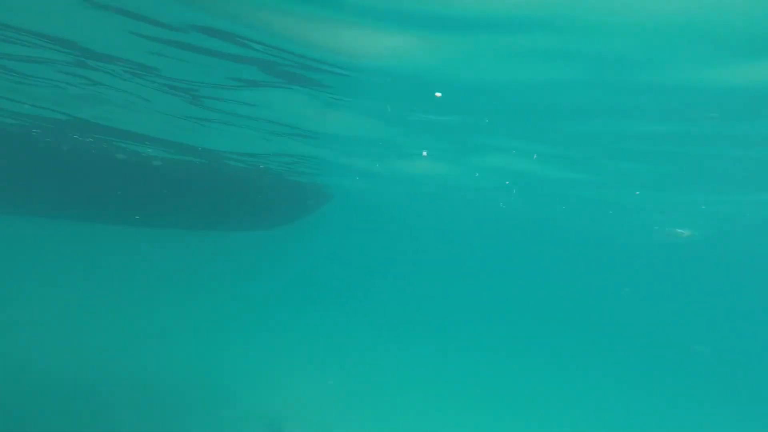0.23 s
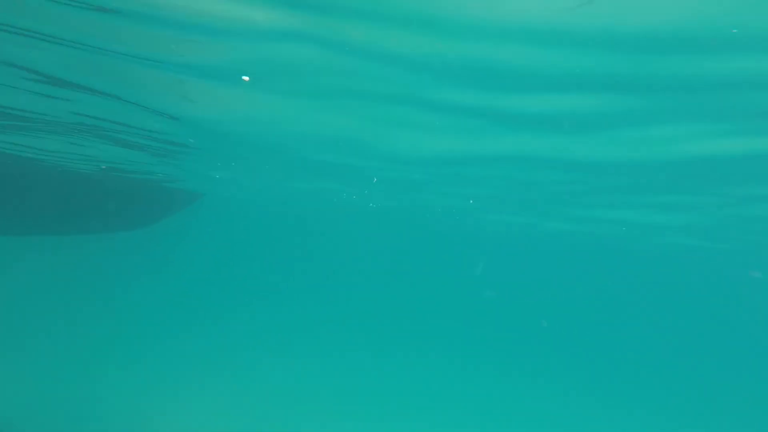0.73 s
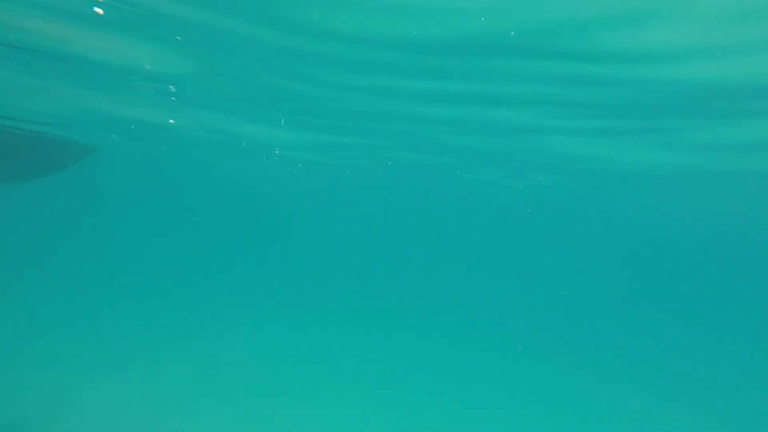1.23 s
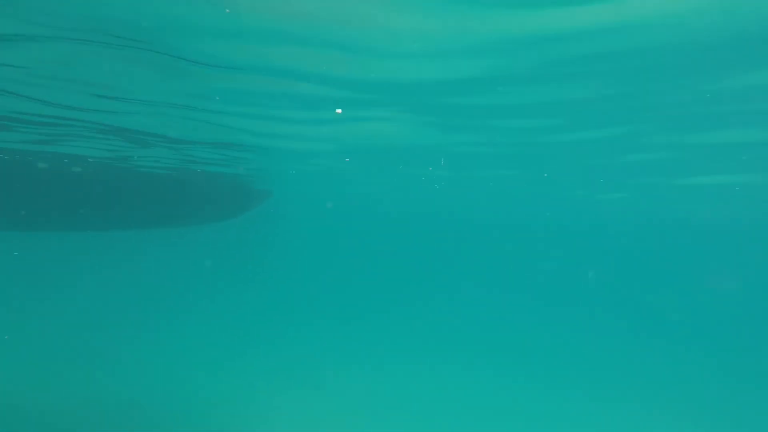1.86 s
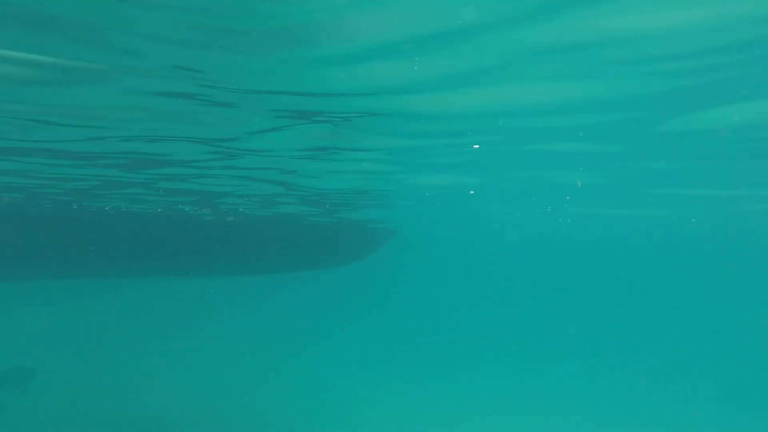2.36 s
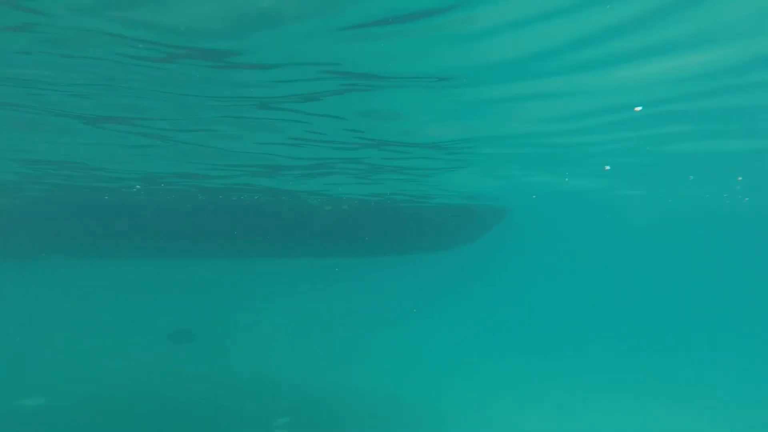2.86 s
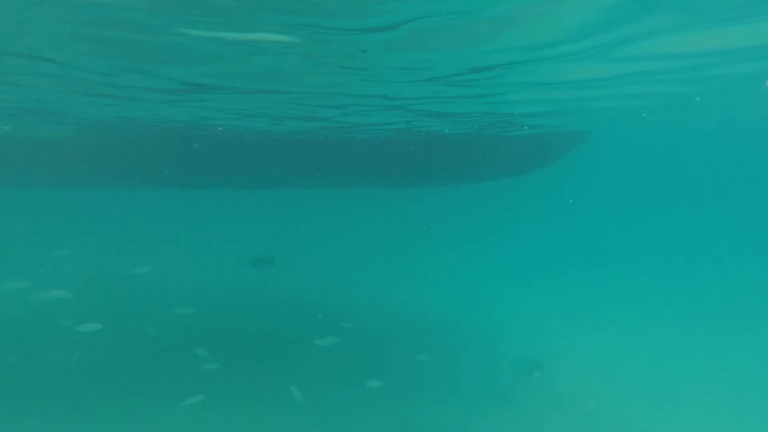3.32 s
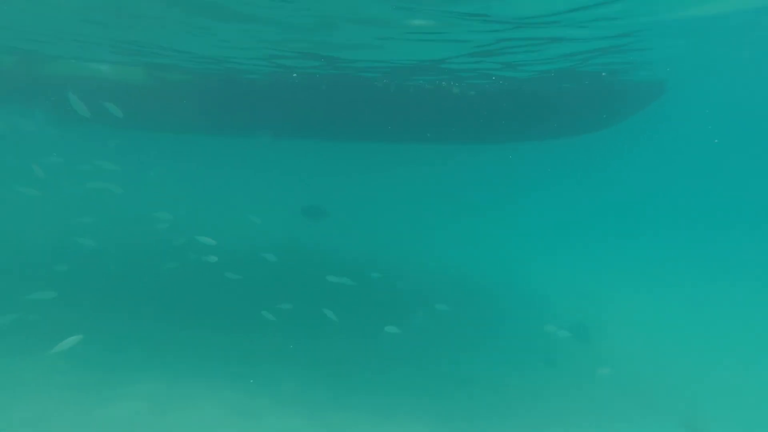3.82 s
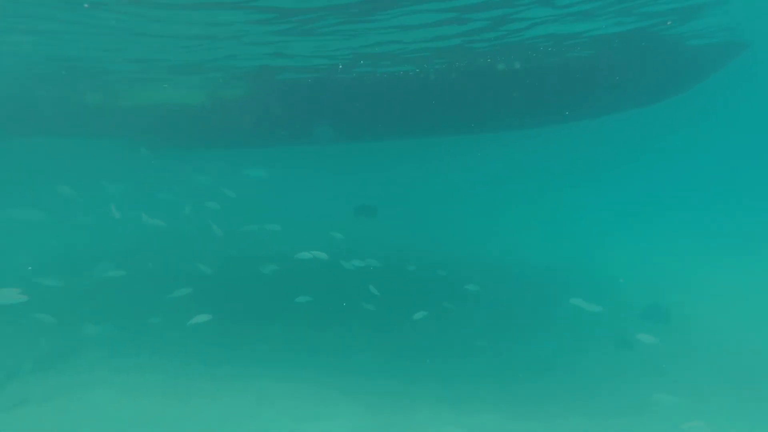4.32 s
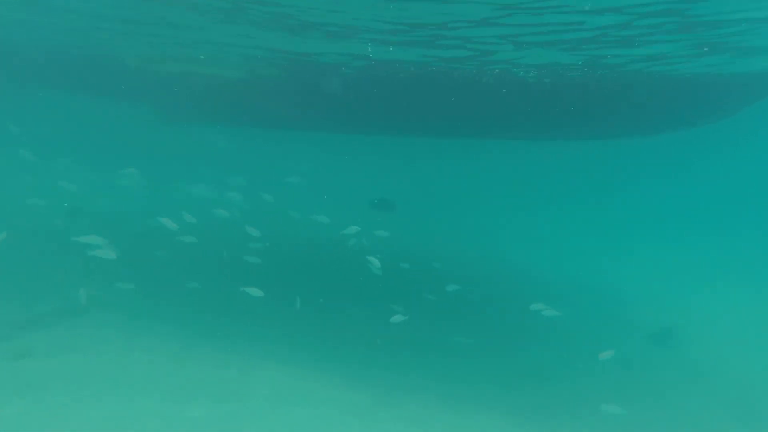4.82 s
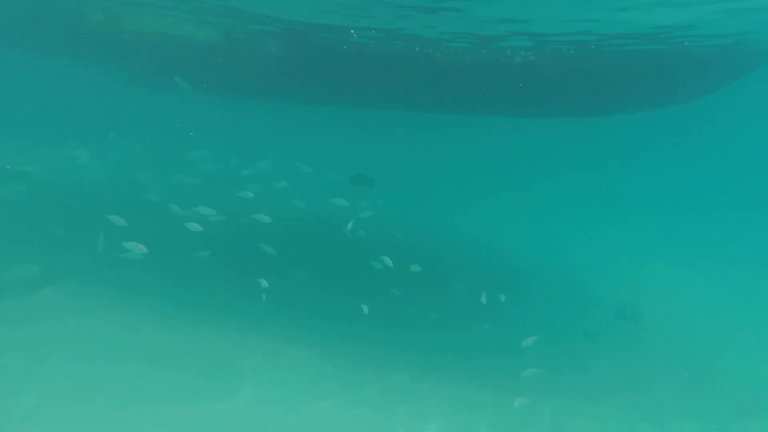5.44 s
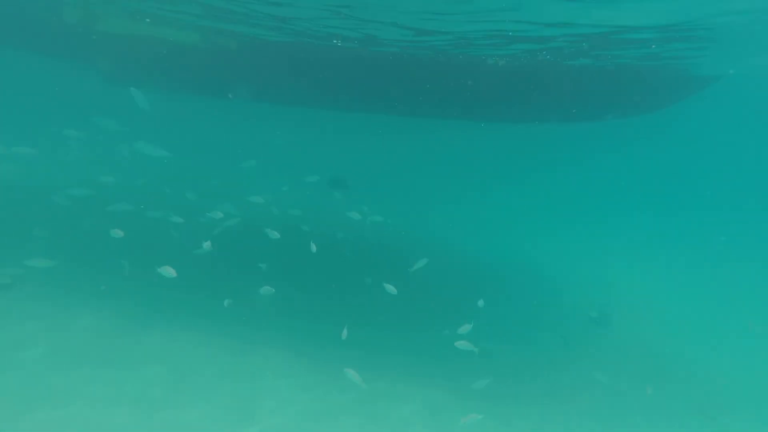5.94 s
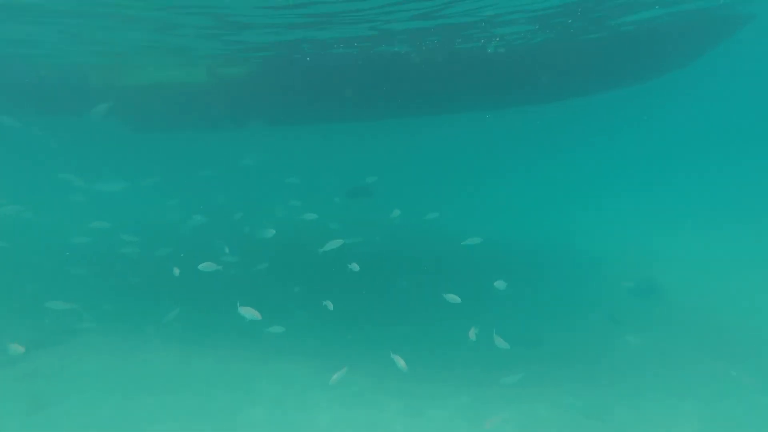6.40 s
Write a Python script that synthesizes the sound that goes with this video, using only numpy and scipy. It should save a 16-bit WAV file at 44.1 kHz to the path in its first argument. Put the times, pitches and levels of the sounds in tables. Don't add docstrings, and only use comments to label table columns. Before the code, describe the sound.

A submerged microphone in a hard housing picks up a deep, steady boat drone, muffled and wide. A close bubble cloud arrives suddenly, knocking, plopping and fizzing in clumps, with a brief slosh and a deep thud near three seconds and the loudest pops momentarily dipping the level. Then it breaks up into stray pops, and quiet motor hum, swell rumble and faint hiss remain.

```python
import sys
import numpy as np
from scipy import signal
from scipy.fft import rfft, irfft, next_fast_len
from scipy.io import wavfile
from scipy.ndimage import uniform_filter1d, minimum_filter1d, map_coordinates

SR = 44100
rng = np.random.default_rng(int(sys.argv[2]) if len(sys.argv) > 2 else 0)


def log_audio(samples):
    frames = np.atleast_2d(samples).T
    limited = np.clip(frames, -1, 1)
    pcm = np.round(limited * 32767).astype(np.int16)
    wavfile.write(sys.argv[1], SR, pcm)


def makeup_ratio(level_db):
    decades = np.asarray(level_db, float) / 20
    return 10 ** decades


N = 294147

# [t/s, gain/dB]
DRONE = [
    (0, 3),
    (4.6, -0.5),
    (4.85, -0.7),
    (6.67, -1.9),
]


def unit(x):
    return x / np.sqrt(np.mean(x ** 2) + 1e-20)


def along(points, hz):
    f, v = np.transpose(points)
    return np.interp(np.log(hz + 1), np.log(f + 1), v)


def curves(rows):
    s, *cols = np.transpose(rows)
    return [np.interp(np.arange(N) / SR, s, c) for c in cols]


def wobble(rate):
    knots = rng.standard_normal(int(N * rate / SR) + 4)
    return map_coordinates(knots, [np.arange(N) * rate / SR])


def filtered(x, response):
    m, edge = next_fast_len(N + SR // 2), SR // 20
    x = np.pad(x, [(0, 0)] * (np.ndim(x) - 1) + [(edge, edge)], mode="reflect")
    spectrum = rfft(x, m) * response(np.fft.rfftfreq(m, 1 / SR))
    return irfft(spectrum, m)[..., edge:edge + N]


def rush(spectrum, alike):
    turn = np.arccos(np.clip(alike, -1, 1)) / 2
    mid, side = filtered(rng.standard_normal((2, N)), lambda hz: makeup_ratio(along(spectrum, hz)))
    mid, side = np.cos(turn) * mid, np.sin(turn) * side
    return unit(np.array([mid + side, mid - side]))


def shell(f):
    # [f/Hz, width/Hz, level/dB]
    shell_modes = [(300, 790, -20.5), (833, 117, -1), (1223, 76, -11.5), (1470, 108, -10), (1950, 83, -11),
                   (2250, 190, -10.5), (3107, 280, -25.5), (3830, 350, -52.5), (4330, 100, -40),
                   (5900, 2400, -38.5), (6940, 680, -61), (9000, 2500, -59)]
    # [f/Hz, level difference/dB, right lead/rad]
    right_to_left = [(200, -2, .4), (300, 0, 1.8), (430, 12, 1.9), (530, 9, 3.8), (650, 1, 3.7),
                     (830, -8, 2.7), (1150, -10, 2.3), (1420, 2, 3.1), (2000, 2.5, 2), (2900, -3, 1.8),
                     (3700, 1, -.9), (5500, 14, -1.8), (7200, 8, -2.8), (9000, 0, -1.3)]
    left = 0
    for k, (hz, w, db) in enumerate(shell_modes):
        mode = 1j * f * w / (hz * hz - f * f + 1j * f * w)
        left = left + (-1) ** k * makeup_ratio(db) * mode
    hz, db, lead = np.transpose(right_to_left)
    across = makeup_ratio(along(np.c_[hz, db], f)) * np.exp(1j * along(np.c_[hz, lead], f))
    return np.array([left, left * across])


def bubbles(rows, rise, chirp, size=1800):
    s, db, hz, t60 = np.transpose(rows)[:, :, None]
    t = np.arange(size) / SR
    ring = np.sin(2 * np.pi * hz * t * (1 + chirp * t / t60))
    fade = makeup_ratio(db - 60 * t / np.maximum(t60, .001))
    onset = 1 - np.exp(-t * hz / rise)
    ring = ring * fade * onset
    at = np.round(s * SR).astype(int) + np.arange(size)
    return np.bincount(at.ravel(), ring.ravel(), N + size)[:N]


def water():
    # [f/Hz, level per Hz/dB]
    boat_noise = [(20, -13.5), (45, -8), (85, 0), (115, -11.5), (180, -16.5), (300, -19.5), (380, -28.5),
                  (520, -33.5), (680, -27.5), (1000, -41), (1300, -43), (2000, -54.5), (3200, -72),
                  (6000, -120)]
    # [t/s, level/dB]
    swells = [
        (0, -27.5),
        (.65, -29.5),
        (1.5, -22),
        (4.81, -23),
        (5.59, -21),
        (6.6, -25),
    ]
    calm_db, rise_db_s, fall_db_s = -35, 75, 53
    s, db = np.transpose(swells)[:, :, None]
    after = np.arange(N) / SR - s
    swell_db = (db + np.minimum(rise_db_s * after, -fall_db_s * after)).max(0)
    rumble_db = np.maximum(calm_db, swell_db)
    noise = makeup_ratio(curves(DRONE)[0] - 26.5 + 0.5 * wobble(6.4)) * rush(boat_noise, alike=0.35)
    lumps = rush([(3, -36.0), (10, -1.0), (25, 11.5), (45, -10.0), (80, -37.5), (200, -120)], alike=0.31)
    return noise + makeup_ratio(rumble_db + 6.0) * lumps


def engines():
    # [t/s, pitch/Hz, left level/dB, right level/dB]
    hum_low = [(0, 103.06, -27, -29.5), (2.15, 103.07, -23.3, -28), (2.45, 103.1, -29, -32),
               (2.85, 103.27, -23.5, -27), (3.34, 103.49, -24.4, -25.7), (3.95, 103.71, -34, -30),
               (4.67, 103.69, -33, -30.7), (5.34, 103.53, -28.4, -31.8), (6.1, 103.38, -31, -39.5),
               (6.67, 103.36, -29.5, -39)]
    hum_mid = [(0, 105.69, -26.5, -21.4), (1.5, 105.66, -33, -24.5), (2.67, 105.61, -41, -26),
               (3.4, 105.6, -32.5, -26.7), (4.2, 105.55, -32.5, -28.5), (5.34, 105.48, -44, -31.8),
               (6.67, 105.46, -43, -28.8)]
    hum_top = [(0, 107.21, -34, -31.5), (1.5, 107.21, -35, -42), (2.5, 107.23, -38, -40),
               (4, 107.32, -34.7, -39.5), (4.67, 107.36, -33.5, -32.2), (6.67, 107.4, -35.5, -32.3)]
    # [t/s, f/Hz, left level/dB, right level/dB]
    thrum = [
        (1, 75, -44, -50),
        (2, 75.6, -24, -30),
        (2.6, 75.6, -34, -39),
        (3.7, 74.2, -22.5, -28),
        (4.25, 75.5, -33, -38),
        (4.8, 75.5, -60, -60),
    ]
    # [f/Hz, left level/dB, right level/dB, left lead/rad]
    thin_tones = [(49.7, -39, -39, -0.7), (52.6, -34, -32, -1.3), (61.8, -40, -39, -0.2),
                  (78.1, -40, -34, -0.1), (82.6, -45, -33, -1.6), (97.1, -40, -38, -1.6),
                  (131.2, -43, -40, -0.3), (144.7, -50, -44, -1.7), (157.95, -37, -36, 0.8),
                  (159.5, -48, -42, -1.1), (206.1, -54, -45, -2.1), (211.6, -40, -45, -0.0),
                  (214.1, -44, -48, -0.6), (215.1, -49, -46, -0.8), (254.5, -51, -49, -1.0),
                  (317.3, -55, -48, 1.8), (324.8, -45, -52, -2.1), (400.5, -62, -59, -0.5),
                  (428.5, -57, -61, -0.8), (467.8, -56, -64, 2.3), (476.2, -58, -57, -0.8),
                  (599.2, -55, -56, -1.6), (647.9, -57, -58, -0.5), (675.9, -61, -58, 0.5)]
    hum_in_step, overtones_in_step = .18, 1.41
    hum, tones, t = np.zeros((2, N)), np.zeros((2, N)), np.arange(N) / SR
    for rows in (hum_low, hum_mid, hum_top, thrum):
        hz, left_db, right_db = curves(rows)
        turns = np.cumsum(hz) / SR
        turns = turns - turns[round(hum_in_step * SR)]
        hum += np.sqrt(2) * makeup_ratio([left_db, right_db]) * np.cos(2 * np.pi * turns)
    for hz, left_db, right_db, lead in thin_tones:
        start = -hz * overtones_in_step if 210 < hz < 216 else rng.random()
        angle = 2 * np.pi * (hz * t + start) + .25 * wobble(.8)
        sway_db = 1.4 * np.array([wobble(.9), wobble(.9)])
        tones += makeup_ratio(sway_db + [[left_db], [right_db]]) * np.cos([angle + lead, angle])
    hum_gain = makeup_ratio(curves([(6.1, 0), (6.5, -7)])[0])
    return hum_gain * hum + makeup_ratio(curves(DRONE)[0] + 3.5) * tones


def knocks():
    # [t/s, peak level/dB, f/Hz, time to fall 60 dB/s]
    bumps = [
        (1.413, -4, 154, 0.016),
        (2.992, -12.5, 197, 0.021),
        (3.1, -2.5, 100, 0.036),
        (3.168, -16.5, 119.6, 0.093),
        (3.634, -14.5, 147.3, 0.058),
        (4.336, -25.5, 268.4, 0.12),
        (4.663, -22, 300, 0.02),
        (6.568, -8.5, 264, 0.021),
    ]
    return makeup_ratio(9.0) * bubbles(bumps, rise=0.96, chirp=0.025)


def swarm(level_db, hz, spread, cycles, scatter_db, count):
    when, pitch, size = rng.random((count, 3)).T
    pitch = hz * np.exp(spread * (2 * pitch - 1))
    peak_db = -scatter_db * np.log(size + 1 / 50)
    rows = np.c_[when * N / SR, peak_db, pitch, cycles / pitch]
    ringing = bubbles(rows, rise=0.54, chirp=0.28, size=round(min(800, 30 * SR / hz)))
    sound = filtered(ringing, shell)
    return makeup_ratio(level_db) * sound / np.std(sound.mean(0))


def cloud():
    # [t/s, density/dB, share of big bubbles/dB, share of small bubbles/dB]
    cloud_mix = [
        (1.15, -63.5, 1, -18.5),
        (1.42, -37, -6.5, -24),
        (2, -32.5, -5.5, -27.5),
        (2.9, -34.5, -9, -18.5),
        (3.15, -25.5, -3.5, -18),
        (3.6, -27.5, -7, -16.5),
        (4, -27, -24, -23.5),
        (4.4, -41.5, -20.5, -19),
        (5, -60, 4, -17),
    ]
    # [t/s, level/dB]
    bunches = [(1.73, 6), (2.48, 0.5), (2.62, 0.5), (3.08, -2.5), (3.219, 3.5), (3.729, 5), (4.34, 6)]
    # [t/s, level/dB]
    surge = [
        (3.09, -99),
        (3.1, -16),
        (3.13, -25),
        (3.24, -26),
        (3.27, -30.5),
        (3.9, -44.5),
        (4.0, -90),
    ]
    bunch_s = 0.045
    t = np.arange(N) / SR
    dense_db, big_db, small_db = curves(cloud_mix)
    present = (t > cloud_mix[0][0]) & (t < cloud_mix[-1][0])
    bunch_db = sum(db * np.exp(-((t - s) / bunch_s) ** 2) for s, db in bunches)
    clumps_db = 1.8 * wobble(35)
    tiny_db = -56.5 + .6 * (dense_db + 30.5) + 0.37 * big_db + clumps_db
    middle_db = dense_db + bunch_db + clumps_db - 2.0
    fizz = swarm(middle_db, hz=929, spread=0.34, cycles=19.0, scatter_db=2.0, count=2600)
    fizz += swarm(dense_db + big_db + .5, hz=445, spread=0.53, cycles=5.3, scatter_db=1.5, count=2000)
    fizz += swarm(dense_db + clumps_db + small_db - .5, hz=1900, spread=0.26, cycles=7.8,
                  scatter_db=3.0, count=5000)
    fizz += swarm(tiny_db, hz=5120, spread=0.49, cycles=7.7, scatter_db=0.0, count=9000)
    slosh = rush([(60, -35.5), (120, -2.0), (300, -8.0), (600, -7.5), (900, -16), (2000, -120)], alike=0.54)
    return present * fizz + makeup_ratio(curves(surge)[0] + 4.0 * wobble(40)) * slosh


def snaps():
    # [t/s, peak level/dB, sizzle level/dB, body level/dB]
    ticks = [(1.345, -47, -21, 8), (1.5094, -54.5, -11, 17), (1.767, -40, -33, -3), (1.8849, -29.5, -2, 17),
             (2.1014, -20.5, -45, -13.5), (2.1432, -40.5, -25.5, -25), (2.162, -38.5, -28, -4),
             (2.206, -36.5, -11, -10), (2.227, -46, -10, 3), (2.382, -45, -13, -13),
             (2.4048, -40.5, -14, -15), (2.4908, -35, -23, -7), (2.655, -38.5, -22, -13),
             (2.889, -42, -29, -13.5), (3.0839, -35, -34, -7), (3.195, -40, -24.5, -8),
             (3.2374, -33.5, -16, 16), (3.3163, -36, -12, -6), (3.4107, -46, -19, 11),
             (3.4214, -34.5, -27, -0.5), (3.4672, -36.5, -26, 2), (3.5054, -55, -6.5, 9),
             (3.5216, -38.5, -7, -7), (4.1534, -35, -22, -9), (4.252, -43.5, -23.5, -12),
             (4.3066, -46, -21, 12), (4.5122, -48.5, -7, -7), (4.987, -46, 3, -5.5)]
    t, sound = np.arange(700) / SR, np.zeros((2, N))
    s, db, sizzle_db, body_db = np.transpose(ticks)[:, :, None]
    at = (np.round(s * SR).astype(int) + np.arange(len(t))).ravel()
    parts = [(db + 9, 5500, .011),
             (db + sizzle_db + 11.5, 10000, .005),
             (db + np.minimum(body_db, 6) + 20.5, 2200, .008)]
    for level_db, hz, t60 in parts:
        envelope = makeup_ratio(level_db - 60 * t / t60) * (1 - np.exp(-t / 0.00019))
        burst = envelope * rng.standard_normal((len(s), len(t)))

        def band(f):
            response = shell(f)
            even = response / np.abs(response.mean(0) + 1e-5)
            return even / (1 + (np.log(f / hz + 1e-9) / 0.32) ** 4)

        sound += filtered(np.bincount(at, burst.ravel(), N + len(t))[:N], band)
    return sound


def pops(rows, gain_db, rise, chirp, t60=None):
    rows = np.array(rows if t60 is None else [(*row, t60) for row in rows], float)
    near = rows[:, 2] * np.array([[.9], [1], [1.1]])
    heard = np.abs(shell(near.ravel()).mean(0)).reshape(near.shape).mean(0)
    rows[:, 1] += gain_db - 20 * np.log10(heard)
    return filtered(bubbles(rows, rise, chirp), shell)


def small_bubbles():
    # [t/s, peak level/dB, f/Hz]
    pings = [(1.4438, -30, 2028), (1.5373, -29.5, 2717), (1.544, -21, 1756), (1.6217, -31, 2100),
             (1.7327, -33.5, 2162), (1.884, -26, 1392), (1.8842, -20, 2428), (1.952, -21.5, 2210),
             (2.028, -33, 1396), (2.191, -25.5, 1322), (2.539, -37, 1548), (2.7053, -36, 2096),
             (2.7824, -25.5, 2205), (2.835, -31.5, 2250), (3.0121, -26.5, 1375), (3.1643, -35, 2116),
             (3.355, -26, 2190), (3.2381, -19, 2083), (3.239, -13.5, 1330), (3.3249, -30, 2342),
             (3.369, -23.5, 1500), (3.5334, -37.5, 2186), (3.6149, -25.5, 2130), (3.6731, -21.5, 2003),
             (3.7489, -24.5, 1950), (3.9046, -35.5, 1876), (4.2787, -38, 2243), (4.5112, -44.5, 2365),
             (1.456, -40, 2324), (1.638, -40.5, 2203), (1.7613, -38, 2216), (2.57, -41, 2093),
             (2.6827, -42, 2040), (2.9531, -38.5, 2160), (3.1022, -33, 2200), (3.2145, -30.5, 1886),
             (3.34, -31.5, 2250), (3.369, -31.5, 1917), (3.6415, -36.5, 2216), (3.853, -40, 2060),
             (3.8855, -46, 2970), (1.884, -34.5, 3930), (1.8845, -35, 4560), (1.5335, -30, 1516),
             (4.357, -52, 2933), (4.63, -52, 2080), (4.849, -50, 2580), (4.96, -49, 2500)]
    # [t/s, peak level/dB, f/Hz]
    sparks = [(1.3465, -42, 4160), (1.4566, -47, 5670), (1.6832, -46.5, 4530), (1.7457, -43, 4084),
              (1.8824, -29, 3536), (1.9928, -47.5, 6560), (2.3003, -48.5, 4920), (2.3412, -49, 4000),
              (2.4456, -47.5, 5880), (2.7324, -45.5, 6240), (2.8082, -45.5, 5480), (2.9702, -46, 5450),
              (2.998, -44, 3490), (3.2171, -38, 4100), (3.362, -44.5, 5660), (3.5416, -43, 5960),
              (3.7099, -45, 3980), (3.8915, -41.5, 6350), (3.921, -47.5, 5360), (4.1807, -48.5, 5910),
              (4.277, -50, 4140), (4.4446, -49.5, 3450), (4.6276, -51.5, 5660)]
    return (pops(pings, gain_db=4.5, rise=0.3, chirp=0.028, t60=0.018)
            + pops(sparks, gain_db=1.5, rise=0.44, chirp=0.02, t60=0.0098))


def big_bubbles():
    # [t/s, peak level/dB, f/Hz]
    glugs = [(1.759, -25, 441), (1.941, -21.5, 400), (2.181, -20.5, 430.4), (2.959, -16.5, 425.5),
             (2.988, -22.5, 320), (3.019, -13, 378), (3.099, -12.5, 409), (3.19, -23, 445),
             (3.213, -19.5, 391), (1.705, -27.5, 426), (1.799, -25.5, 414), (1.858, -25, 570),
             (2.093, -24.5, 407), (2.482, -27, 443.5), (2.804, -28.5, 442), (2.839, -28, 418),
             (3.138, -22.5, 386.5), (3.276, -21.5, 383), (3.385, -25.5, 451), (3.498, -25.5, 416),
             (3.649, -29, 461), (3.988, -25.5, 434.6)]
    return pops(glugs, gain_db=7.0, rise=0.87, chirp=0.039, t60=0.032)


def shell_bubbles():
    # [t/s, peak level/dB, f/Hz]
    rims = [(1.7016, -19, 1056), (2.278, -36.5, 1172), (2.294, -25, 1108), (2.4773, -19.5, 1114),
            (2.542, -19.5, 1122), (2.6192, -35.5, 1123), (2.7039, -28.5, 1145), (2.8471, -27.5, 1178),
            (2.9489, -30, 1168), (3.1026, -25.5, 1105), (3.4859, -27.5, 1082), (3.5985, -28.5, 1121),
            (3.6293, -26, 1187), (3.7157, -24.5, 1082), (3.9527, -30, 1070), (3.9784, -30, 1058),
            (4.0023, -27, 1124)]
    # [t/s, peak level/dB, f/Hz, time to fall 60 dB/s]
    trapped = [
        (1.824, -4, 786, 0.031),
        (3.047, -10, 905, 0.087),
    ]
    return (pops(rims, gain_db=3.0, rise=0.73, chirp=0.033, t60=0.042)
            + pops(trapped, gain_db=9.5, rise=5.6, chirp=0.02))


def middle_bubbles():
    # [t/s, peak level/dB, f/Hz]
    plops = [(1.456, -20, 857), (1.537, -19, 908), (1.562, -18, 1106), (1.683, -22, 842),
             (1.698, -19.5, 816), (1.777, -14, 710), (1.797, -24, 810), (1.923, -22, 780),
             (2.151, -21, 885), (2.305, -14.5, 852), (2.364, -13.5, 894), (2.531, -13, 893),
             (2.705, -15, 897), (2.841, -16.5, 890), (2.937, -27, 870), (3.106, -20, 804),
             (3.124, -14.5, 863), (3.157, -16.5, 827), (3.368, -16.5, 824), (3.47, -22, 913),
             (3.719, -14.5, 943), (3.862, -16, 740), (3.894, -19, 856), (3.932, -31.5, 846),
             (4.004, -20.5, 854), (4.051, -16, 857), (4.215, -19, 916), (4.444, -31, 847),
             (4.51, -22.5, 795), (1.348, -31, 825), (1.713, -17, 893), (1.749, -19.5, 830),
             (1.939, -22.5, 746), (2.028, -19.5, 795), (2.38, -19, 880), (2.414, -16.5, 874),
             (2.463, -24.5, 859), (2.518, -19, 888), (2.544, -16, 880), (3.017, -27, 782),
             (3.183, -19.5, 876), (3.428, -22, 842), (3.517, -23.5, 889), (3.558, -21, 874),
             (3.621, -16.5, 863), (3.943, -20.5, 876), (4.075, -22, 809), (4.095, -28, 853),
             (4.314, -27.5, 817), (4.335, -21.5, 900), (4.36, -27, 860), (4.39, -32, 820)]
    # [t/s, peak level/dB, f/Hz]
    pocks = [(1.544, -22, 833), (1.622, -7.5, 916), (1.886, -13, 930), (2.192, -18.5, 844), (2.4, -8, 827),
             (2.44, -15.5, 867), (2.48, -12, 897), (2.62, -27, 844), (2.755, -16.5, 720), (2.881, -12, 837),
             (2.96, -15.5, 855), (3.278, -28, 875), (3.344, -14.5, 856), (3.388, -13.5, 886),
             (3.676, -7, 877), (3.746, -5.5, 830), (4.158, -14.5, 876), (4.564, -26, 838),
             (4.682, -37, 814), (4.773, -25, 1005), (4.904, -27.5, 884)]
    free_t60, damped_t60 = 0.032, 0.016
    rows = [(*row, free_t60) for row in plops] + [(*row, damped_t60) for row in pocks]
    return pops(rows, gain_db=4.5, rise=0.98, chirp=0.031)


def scene():
    background = water() + engines() + knocks()
    single = snaps() + small_bubbles() + big_bubbles() + shell_bubbles() + middle_bubbles()
    return background + cloud() + single


def gain_control():
    # [t/s, gain/dB]
    ducks = [
        (1.631, -0.5),
        (3.069, -2.5),
        (3.252, -10),
        (3.754, -7),
    ]
    clamp_s, recover_s = 0.0048, 0.037
    s, db = np.transpose(ducks)[:, :, None]
    after = np.maximum(np.arange(N) / SR - s, 0)
    clamp = 1 - np.exp(-(after / clamp_s) ** 2)
    recovery = np.exp(-(after / recover_s) ** 2)
    return makeup_ratio((db * clamp * recovery).sum(0))


def roll_off(x):
    return signal.sosfilt(signal.butter(12, 15250, fs=SR, output="sos"), x)


def record(dry):
    # [f/Hz, level per Hz/dB]
    hiss = [(1500, -15), (2500, -5.5), (3300, -14), (5000, -6.5), (7000, -8), (9000, -0.5), (10500, -5.5),
            (13000, -8), (15000, -20), (16000, -69)]
    bright = (filtered(dry, lambda hz: hz > 600) ** 2).mean(0)
    loudness = np.sqrt(np.abs(uniform_filter1d(bright, size=2600, origin=900)))
    busy = np.sqrt(np.abs(uniform_filter1d(bright, size=9000)))
    quiet = 1 / (1 + (busy / makeup_ratio(-38.5)) ** 8)
    closed = 1 - 1 / (1 + (busy / makeup_ratio(-33)) ** 2)
    x = dry + makeup_ratio(-59.5) * rush(hiss, alike=0.45) / (1 + loudness / makeup_ratio(-15.0)) ** 0.77

    # low Hz, top Hz, eagerness
    removed = np.zeros((2, N))
    for low, top, fast in ((13600, 20000, 6), (12900, 13600, 3), (12100, 12900, 1.1), (11300, 12100, .6)):
        shut = np.clip(fast * closed + .25 * wobble(14), 0, 1) * (closed > .03)
        removed += shut * filtered(x, lambda hz: (hz > low) * (hz <= top))
    x = x - removed

    mid, side = np.array([[.5, 0.47], [.5, -0.49]]) @ x
    treble = filtered(side, lambda hz: np.clip((hz - 1500) / 1500, 0, 1) * (1 - .6 * (hz > 12500)))
    side = side - quiet * treble
    x = gain_control() * np.array([mid + side, mid - side])
    need = np.minimum(1, .85 / (np.abs(x).max(0) + 1e-9))
    x = x * uniform_filter1d(minimum_filter1d(need, size=600), size=500)
    return roll_off(x)


dry = scene()
out = record(dry)
log_audio(out)
```